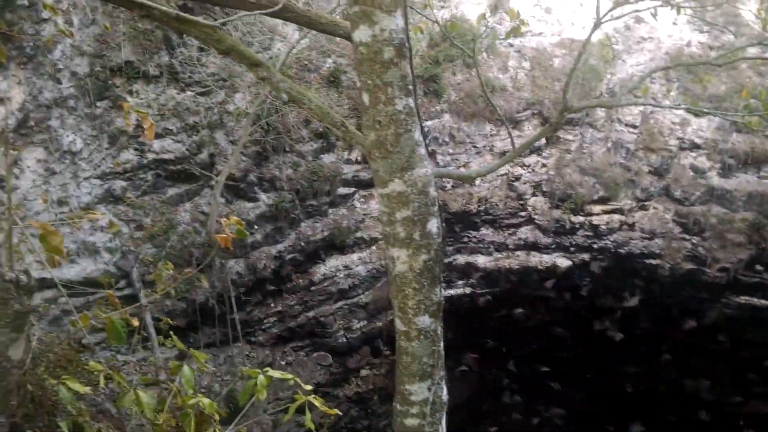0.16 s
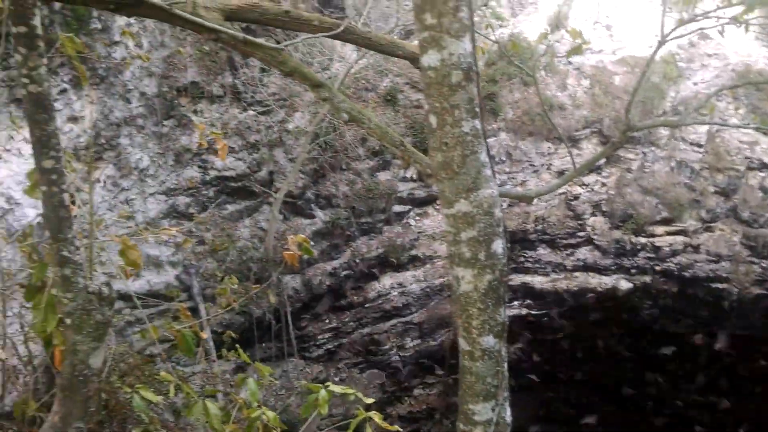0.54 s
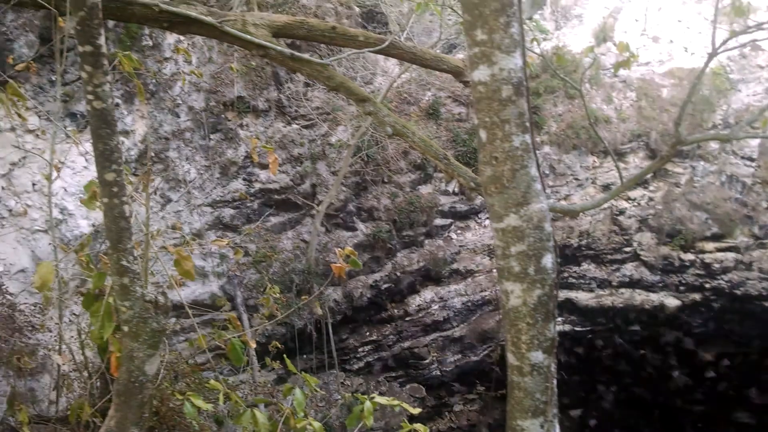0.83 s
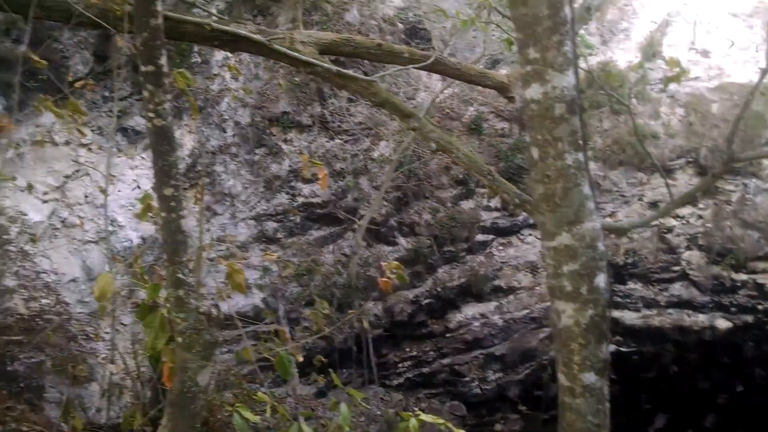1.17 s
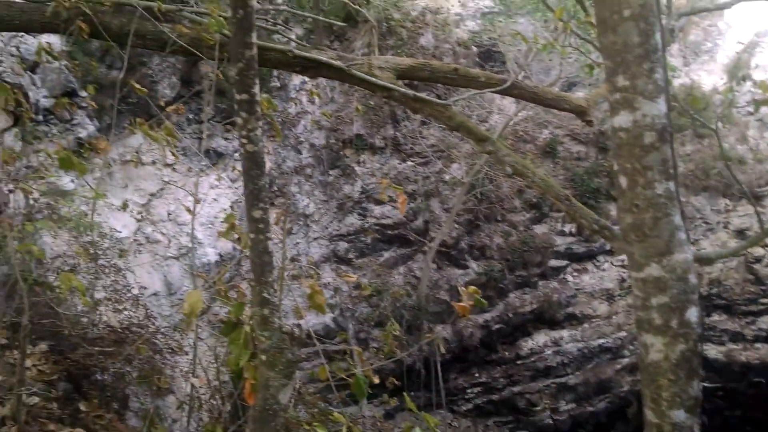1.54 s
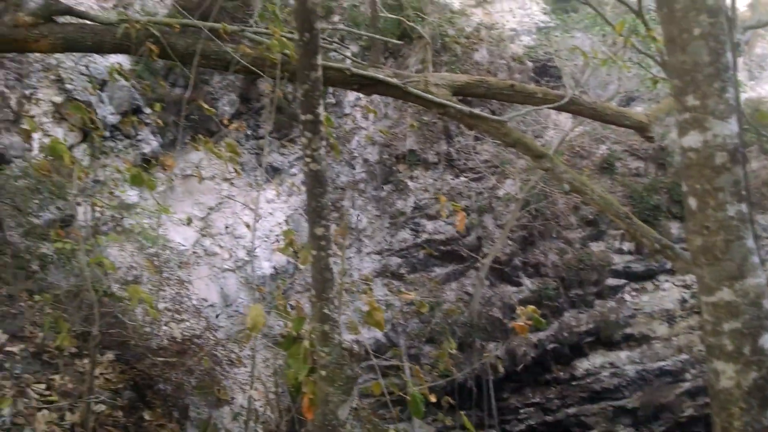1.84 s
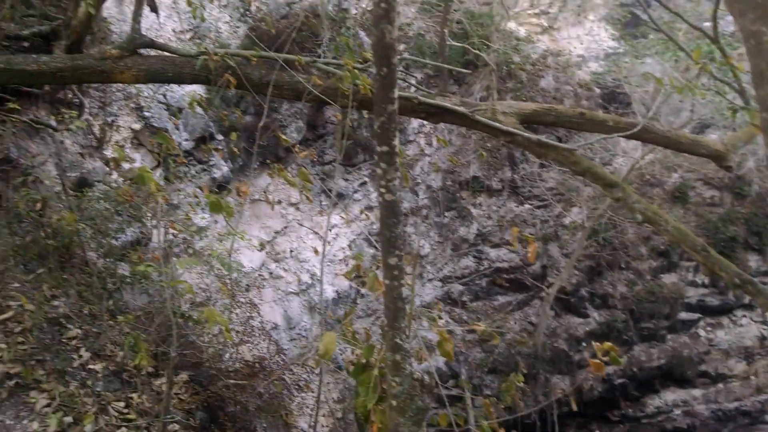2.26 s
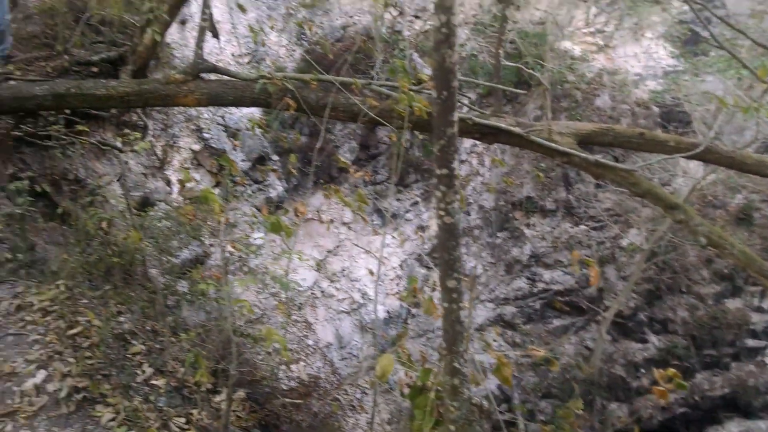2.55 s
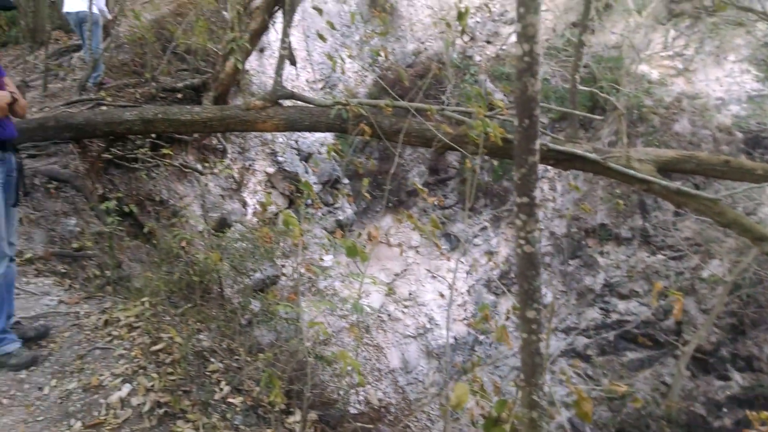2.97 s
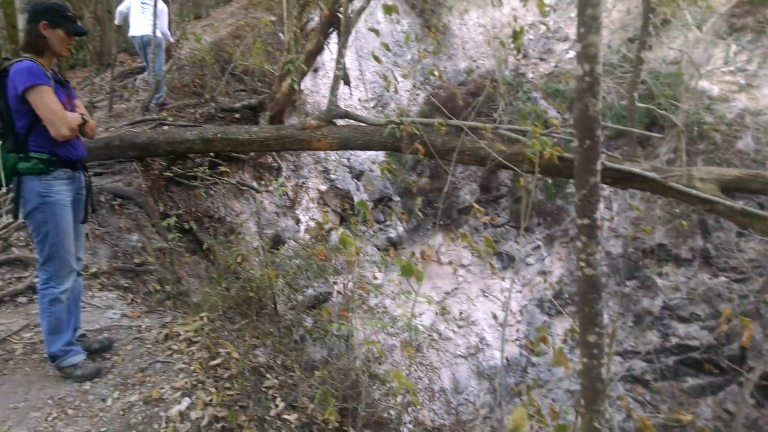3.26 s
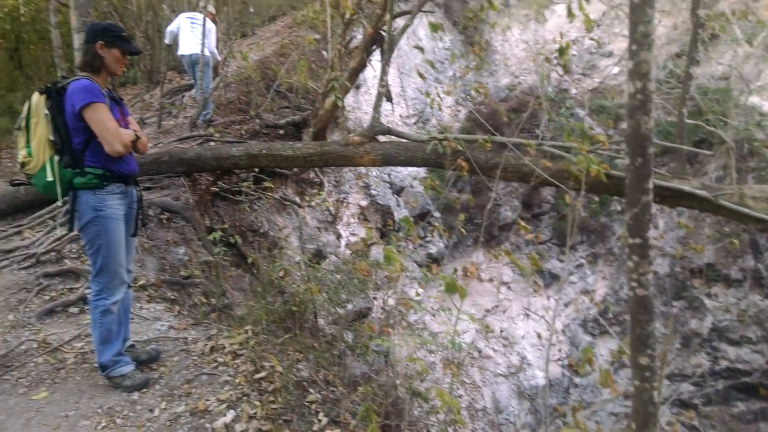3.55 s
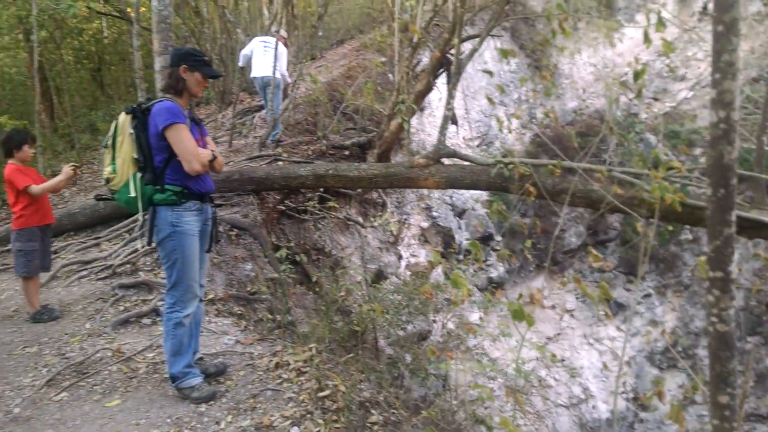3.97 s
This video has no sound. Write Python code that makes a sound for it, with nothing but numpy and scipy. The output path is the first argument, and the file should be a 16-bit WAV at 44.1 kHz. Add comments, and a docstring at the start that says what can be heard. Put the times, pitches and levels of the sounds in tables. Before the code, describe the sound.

Many bats squeak in short, very high chirps over a steady hiss and the soft roar of wings at a forest cave.

```python
"""A forest path, with a swarm of bats streaming out of a cave mouth on the right.
Countless wingbeats merge into a soft roar that sets the cave mouth ringing, and distant calls
blur into a high hiss. On top, the nearest bats squeak in short falling sweeps that the rock face
throws back. A faint hum, a few papery rustles and light knocks fill in the background."""
import sys
import numpy as np
from scipy import signal
from scipy.fft import rfft, irfft
from scipy.io import wavfile
from scipy.ndimage import uniform_filter1d

SR = 44100
rng = np.random.default_rng(int(sys.argv[2]) if len(sys.argv) > 2 else 0)


def transcribe(signal):
    """Save signal, clipped to [-1, 1], as a 16-bit WAV file at the path in sys.argv[1]."""
    frames = np.atleast_2d(signal).T
    limited = np.clip(frames, -1, 1)
    pcm = np.round(limited * 32767).astype(np.int16)
    wavfile.write(sys.argv[1], SR, pcm)


N = 181495
TIME = np.arange(N) / SR
BIN_HZ = np.arange(N // 2 + 1) * SR / N

# Fader ride of the low hum. Each row: time in seconds, level in dB before panning.
HUM_RIDE = [(0, -56), (.45, -60), (.65, -56.5), (1.15, -55), (1.55, -59.5), (1.9, -57.5), (2.15, -60),
            (2.75, -62), (2.95, -57.5), (3.5, -59.5), (3.85, -66), (4.12, -62)]
# Knocks on the path. Each row: start in seconds, level in dB before EQ, pitch in Hz.
KNOCKS = [(2.131, -45, 1290), (2.497, -30.5, 850), (2.502, -33.5, 850)]
# A knock's hollow ring. Each row: multiple of its pitch, relative level in dB.
KNOCK_PARTIALS = [(1, 0), (1.22, -8), (1.85, -8), (2.35, -20)]
# EQ that takes the bass and the sharp edge off a knock. Each row: frequency in Hz, gain in dB.
KNOCK_EQ = [(450, -20), (780, 0), (1950, 0), (2600, -18)]
# Fader rides of the cave mouth's two resonances. Each row: time in seconds, level in dB.
LOW_RING_RIDE = [(0, -53), (.18, -54.5), (.38, -59), (.62, -54), (.93, -66), (1.2, -57), (1.4, -56),
                 (1.55, -60), (1.78, -57), (1.95, -62), (2.18, -55), (2.7, -60.5), (3.1, -57.5),
                 (3.65, -60), (4.12, -63)]
HIGH_RING_RIDE = [(0, -64), (.25, -56.5), (.55, -68), (1.0, -64), (1.5, -63), (1.8, -59), (2.02, -63),
                  (2.2, -50), (2.4, -52.5), (2.62, -60), (2.9, -55), (3.3, -61), (3.75, -61), (4.12, -54.5)]
# Stereo image of roar and rustles before widening. Each row: frequency in Hz, left-right correlation.
AIR_CORRELATION = [(40, 0.14), (200, 0.63), (650, 0.71), (1300, 0.49), (1900, -0.02)]
# Comb that widens that image. Each row: frequency in Hz, depth of the swing in correlation.
WIDENING_DEPTH = [(500, 0.17), (1300, 0.25), (2400, 1.26), (3400, 1.44), (5700, 1.73), (6600, 0.8),
                  (8000, 0.65)]
# Close rustles. Each row: peak time in seconds, length in seconds, centre in Hz, level in dB.
RUSTLE_CUES = [(1.503, .025, 4640, -54.5), (1.8, .03, 4100, -59), (2.41, 0.064, 3830, -60.5),
               (2.903, .04, 4000, -60)]
# Fader ride of the wing roar. Each row: time in seconds, relative level in dB.
WING_RIDE = [(0, -48), (.6, -48), (.95, -50), (1.1, -48), (1.95, -48.5), (2.22, -47.5), (2.45, -47),
             (2.65, -50), (2.9, -48), (3.3, -48), (4.12, -47.5)]
# Tone of the wing roar. Each row: frequency in Hz, relative level in dB.
WING_EQ = [(20, -6), (100, -7), (135, -2.5), (220, -2.5), (330, -1.5), (500, -1.5), (750, -5), (1100, -10),
           (1800, -13.5), (3000, -17), (4900, -23), (6000, -19.5), (7200, -10.5), (15000, -22.5)]
# Bands where the wing membranes flutter. Each row: centre in Hz, half-width in Hz.
WING_FLUTTER = [(1300, 420), (3900, 900), (6800, 3400)]
# The body of the roar leans towards the cave. Each row: frequency in Hz, left minus right in dB.
WING_PAN = [(80, 0), (180, -1.3), (350, -1), (650, -3), (1200, .5), (2500, 0)]
# Fader ride of the distant calls. Each row: time in seconds, relative level in dB.
CHORUS_RIDE = [(0, -36.5), (.15, -35.5), (.4, -36.5), (.65, -36), (.75, -38), (1.0, -38), (1.22, -39),
               (1.32, -37.5), (1.85, -36.5), (2.08, -36.5), (2.4, -35), (2.58, -38.5), (2.72, -38.5),
               (3.0, -36), (3.28, -36), (3.72, -38), (4.12, -34)]
# Tone of their hiss. Each row: frequency in Hz, relative level in dB.
CHORUS_EQ = [(5500, -108), (7500, -9), (8700, -5.5), (9500, -0.5), (10050, 0), (11000, -2), (12400, -5),
             (13700, -2), (15200, 2.5), (16000, 6)]
# The nearest bats. Each row: start in seconds, length in seconds, start pitch in Hz, end pitch in Hz,
# bend (0 is straight, 3 levels off early), relative level in dB, share scattered by ledges (0 to 1).
NEAR_CALLS = [(.028, .022, 13000, 9800, 1.0, -27, .4), (.032, 0.026, 14000, 11100, .5, -26.5, 0.36),
              (.085, .018, 11000, 9800, .5, -29, .6), (.122, .025, 13800, 12050, 2.5, -29, .3),
              (.124, .018, 10800, 9660, 1.1, -25.5, .3), (.203, .013, 14600, 12200, .3, -28, .35),
              (.213, 0.022, 12300, 9350, .3, -25.5, .3), (.308, 0.018, 14200, 10600, .5, -27.5, .4),
              (.412, .012, 12000, 10350, .5, -28, .7), (.493, .012, 14000, 11700, .3, -35, .3),
              (.520, .032, 11200, 10400, 2.7, -30.5, .4), (.580, 0.047, 14300, 10900, 2.0, -24.5, .25),
              (.592, .018, 14000, 12400, .5, -31, .4), (.6265, 0.0043, 16000, 8900, 0.27, -19, 0.22),
              (.700, .024, 14500, 11300, .6, -27, .25), (.776, 0.03, 14700, 10400, 0.23, -28.5, .4),
              (.797, .025, 14700, 11300, .3, -29, .2), (.838, .020, 13000, 11200, .3, -30, .25),
              (.877, .016, 15800, 10700, .3, -28, .3), (.892, 0.021, 13800, 12300, .5, -32, .3),
              (.994, 0.021, 12800, 10950, 1.1, -30.5, .15), (1.066, .014, 13800, 12800, .4, -34, .3),
              (1.122, .010, 14800, 13500, .5, -31, .4), (1.138, .021, 14900, 12950, .5, -28.5, .4),
              (1.165, 0.0077, 12000, 10100, .6, -22.5, .15), (1.250, .013, 14500, 12300, .3, -33, .4),
              (1.272, .011, 11200, 9850, 2.4, -20.5, .08), (1.283, .014, 14900, 13400, .3, -31, .3),
              (1.380, .009, 16000, 13200, .1, -25.5, .4), (1.389, .006, 14500, 11500, .1, -30, .3),
              (1.477, .014, 14700, 12600, .4, -32, .3), (1.523, 0.01, 13000, 11500, .5, -28.5, .2),
              (1.570, 0.024, 13500, 11250, .6, -27.5, .2), (1.602, 0.02, 10900, 9430, 0.9, -26, 0.39),
              (1.617, .010, 12800, 11500, 1.0, -27, .6), (1.610, .016, 12300, 9300, .3, -31, .5),
              (1.698, .012, 14000, 9700, 0.23, -30, .3), (1.735, .012, 14300, 12900, .4, -31, .4),
              (1.805, .014, 13500, 12100, .5, -34, .3), (1.883, .032, 14200, 10900, .85, -29, .4),
              (1.905, .018, 13800, 9200, 0.27, -30.5, .5), (1.995, .034, 14500, 10630, 4, -28.5, .3),
              (2.192, .018, 15200, 13100, .4, -32, .3), (2.214, .018, 13000, 11400, 1.2, -28, .3),
              (2.282, .012, 15200, 13300, .4, -29, .3), (2.298, .013, 13000, 12100, .8, -27, .3),
              (2.310, .014, 13800, 11900, .5, -29, .3), (2.327, 0.015, 11500, 9050, 0.35, -29, .2),
              (2.388, 0.0073, 13900, 12300, .5, -26, .4), (2.408, .009, 15200, 10000, .2, -28, .3),
              (2.522, .012, 13000, 12000, .5, -33, .3), (2.675, 0.011, 13400, 11800, .4, -36, .4),
              (2.950, .042, 15000, 9960, 0.73, -33.5, .4), (3.005, .025, 14000, 11500, .5, -36, .4),
              (3.065, .018, 10400, 10000, 2.3, -32, .3), (3.142, 0.024, 12400, 9970, 1.1, -22, .2),
              (3.146, .024, 13300, 11300, .5, -30, .4), (3.186, .018, 10900, 10100, .3, -29, .3),
              (3.249, 0.017, 13500, 10600, .8, -24, .5), (3.258, .010, 11200, 9870, .96, -18.5, .1),
              (3.262, .006, 15500, 10500, .2, -27, .6), (3.310, 0.013, 11000, 10200, .5, -28, .4),
              (3.347, .013, 12800, 10100, .3, -27.5, .3), (3.365, 0.015, 12300, 10500, .5, -32, .3),
              (3.415, .016, 11000, 9900, 0.53, -32, .3), (3.455, .008, 14800, 13000, .4, -29, .3),
              (3.460, .022, 12700, 10400, 1.0, -31, .2), (3.520, .015, 15200, 13900, .4, -29.5, .55),
              (3.552, .012, 14200, 13100, .5, -33, .4), (3.580, .012, 14800, 10800, .3, -31, .3),
              (3.626, .012, 15000, 13000, .4, -31, .4), (3.644, .012, 14700, 12500, .4, -32, .5),
              (3.533, .010, 13400, 11300, .5, -30, .4), (3.642, 0.013, 13000, 10700, 3, -30, .4),
              (3.668, 0.047, 12500, 10800, 1.8, -28.5, .15), (3.770, 0.017, 13800, 10750, 3.5, -29, .15),
              (3.775, .026, 15200, 12500, .4, -31.5, .6), (3.800, .016, 12500, 11000, .5, -31, .3),
              (3.820, 0.026, 11000, 10000, .3, -26.5, .3), (3.901, 0.017, 13700, 10900, .3, -31, .3),
              (3.928, 0.03, 12100, 9800, .5, -28, .3), (3.955, .020, 11800, 10000, 0.56, -32, .4),
              (4.012, .020, 15200, 12700, .4, -32, .4), (4.055, 0.0097, 12000, 10600, 1.7, -25, .4),
              (4.066, 0.024, 13500, 10900, 1.0, -30, .3), (4.090, .012, 14800, 12500, .3, -32, .3)]


def undb(db):
    """Decibels to gain."""
    return 10 ** (np.asarray(db) / 20)


def unit(x):
    """Scale to rms 1."""
    return x / np.sqrt(np.mean(x ** 2))


def ride(rows):
    """Turn (seconds, dB) points into a gain for every sample."""
    return undb(np.interp(TIME, *np.transpose(rows)))


def across_bins(rows):
    """Read (Hz, value) points at every frequency bin, on a log axis."""
    hz, value = np.transpose(rows)
    return np.interp(np.log(BIN_HZ + 1), np.log(hz), value)


def eq(x, gain):
    """Filter with one gain for each frequency bin."""
    return irfft(rfft(x) * gain, N)


def resonance(x, hz, half_width_hz):
    """Keep a band around one frequency."""
    return eq(x, 1 / (1 + ((BIN_HZ - hz) / half_width_hz) ** 2))


def wobble(per_s):
    """Smooth random modulation with a spread near 1 and per_s new values a second."""
    hold = max(int(SR / per_s), 1)
    steps = np.repeat(rng.standard_normal(N // hold + 1), hold)
    return np.sqrt(2) * uniform_filter1d(uniform_filter1d(steps, hold), hold)[:N]


def add(track, s, sound):
    """Mix a sound into a track at s seconds."""
    start = int(np.clip(s * SR, 0, N))
    track[..., start:start + sound.shape[-1]] += sound[..., :N - start]


def from_right(x, lag_s=.000322):
    """Sound from the cave reaches the left side a little later."""
    return np.array([eq(x, np.exp(-2j * np.pi * BIN_HZ * lag_s)), x])


def hum(hz=61.25, left_db=.5, right_db=-6):
    """A faint low hum sits to the left and wavers a little."""
    tone = np.sqrt(2) * np.sin(2 * np.pi * hz * TIME + .15 * wobble(4))
    return tone * ride(HUM_RIDE) * undb([[left_db], [right_db]])


def knocks(t60=.017, contact_s=.00056):
    """Small things knock on the path: a soft contact, then a hollow ring whose upper modes die first."""
    track, t = np.zeros(N), TIME[:SR // 20]
    attack = 1 - np.exp(-(t / contact_s) ** 2)
    for s, db, hz in KNOCKS:
        ring = sum(undb(mode_db - 60 * t * ratio / t60) * np.sin(2 * np.pi * hz * ratio * t)
                   for ratio, mode_db in KNOCK_PARTIALS)
        add(track, s, undb(db) * ring * attack)
    return eq(track, undb(across_bins(KNOCK_EQ)))


def cave_mouth_ring():
    """The cave mouth rings faintly with wing noise: two narrow noise bands that swell in turn."""
    low = unit(resonance(rng.standard_normal(N), hz=219, half_width_hz=38))
    high = unit(resonance(rng.standard_normal(N), hz=316, half_width_hz=58))
    return low * ride(LOW_RING_RIDE) + high * ride(HIGH_RING_RIDE)


def air_noise(colour, widening_lag_s=.000376):
    """Wide coloured noise: its two sides swing between alike and opposite along the spectrum."""
    comb = across_bins(WIDENING_DEPTH) * np.cos(2 * np.pi * BIN_HZ * widening_lag_s)
    correlation = np.clip(across_bins(AIR_CORRELATION) - comb, -.998, .998)
    mid = eq(rng.standard_normal(N), colour * np.sqrt(1 + correlation))
    side = eq(rng.standard_normal(N), colour * np.sqrt(1 - correlation))
    return unit(np.array([mid + side, mid - side]))


def rustles(half_width_hz=900):
    """Short papery swishes near the path."""
    track = np.zeros((2, N))
    for peak_s, length_s, hz, db in RUSTLE_CUES:
        swish = air_noise(np.exp(-((BIN_HZ - hz) / half_width_hz) ** 2))
        swell = np.exp(-(2 * (TIME - peak_s) / length_s) ** 2)
        track += swish * swell * undb(db)
    return track


def wing_roar(gain_db=3.5):
    """Puffs of air from countless wings overlap into a low roar whose papery top flutters unevenly."""
    rush = air_noise(undb(across_bins(WING_EQ))) * ride(WING_RIDE) * undb(gain_db)
    roar = rush.copy()
    for hz, half_width_hz in WING_FLUTTER:
        flutter_db = .7 * wobble(22) + .7 * wobble(70) + 1.1 * wobble(400) - .3
        roar += resonance(rush, hz, half_width_hz) * (undb(flutter_db) - 1)
    pan_db = across_bins(WING_PAN)
    return eq(roar, undb([pan_db / 2, -pan_db / 2]))


def bat_call(length_s, start_hz, end_hz, bend=.863, waver_hz=115):
    """One call: the pitch drops fast and levels off while the voice swells, then stops short."""
    progress = np.linspace(0, 1, max(int(length_s * SR), 32))
    hz = end_hz + (start_hz - end_hz) * (1 - progress) * np.exp(-bend * progress)
    hz += waver_hz * np.interp(progress, np.linspace(0, 1, 16), rng.standard_normal(16))
    swell = progress ** .56 * (1 - progress ** 8)
    return np.sqrt(2) * swell / swell.max() * np.sin(2 * np.pi * np.cumsum(hz) / SR)


def far_calls(count=3000):
    """Many bats far off, each with its own pitch, call length and distance."""
    track = np.zeros(N)
    for when, pitch, fall, length, loud in np.c_[rng.random((count, 4)), rng.standard_normal(count)]:
        end_hz = 8000 + 7700 * pitch
        call = bat_call(.005 + .02 * length, end_hz + 500 + 3000 * fall, end_hz)
        add(track, when * N / SR, call * undb(3.5 * min(loud, 2)))
    return unit(track)


def distant_chorus(left_db=-1.5, right_db=6.5, flicker_db=.67):
    """A bed of distant calls, some direct, most blurred into hiss inside the cave."""
    from_mouth = undb(-5) * rng.standard_normal(N) + undb(-6) * far_calls()
    all_round = rng.standard_normal((2, N))
    crowd = (all_round + from_right(from_mouth)) * undb(flicker_db * wobble(27.7))
    hiss = unit(eq(crowd, undb(across_bins(CHORUS_EQ))))
    return hiss * ride(CHORUS_RIDE) * undb([[left_db], [right_db]])


def midstream_calls(per_s=52, low_hz=9530, high_hz=12860, max_fall_hz=3793, scattered=.51):
    """Rows like NEAR_CALLS for weaker bats deeper in the stream; their level follows the chorus."""
    count = int(per_s * N / SR)
    when, length, pitch, fall, bend, loud = rng.random((6, count))
    start_s = (np.arange(count) + when) / per_s
    length_s = np.interp(length, [0, 1], [.00805, .026])
    end_hz = low_hz + (high_hz - low_hz) * pitch ** 1.4  # favours the low pitches
    start_hz = end_hz + max_fall_hz * np.sqrt(fall)
    db = np.interp(start_s, *np.transpose(CHORUS_RIDE)) - 5 + 4 * loud
    return np.c_[start_s, length_s, start_hz, end_hz, .99 * bend, db, np.full(count, scattered)]


def ledge_reflections(call, count=24, mean_lag_s=.009):
    """Early reflections off the ledges, different for every call because the bat has flown on."""
    span = SR // 20
    lags = np.minimum(SR * rng.exponential(mean_lag_s, (2, count)), span - 1).astype(int)
    gains = rng.standard_normal((2, count))
    taps = np.array([np.bincount(lag, gain, span) for lag, gain in zip(lags, gains)])
    taps /= np.linalg.norm(taps, axis=1, keepdims=True)
    return signal.fftconvolve(call[None], taps, axes=1)


def cliff_echo(x, t60=.34):
    """Rough rock scatters the sound into a dense dying tail, different on each side."""
    t = TIME[:SR // 2]
    tail = rng.standard_normal((2, len(t))) * undb(-60 * t / t60)
    tail /= np.linalg.norm(tail, axis=1, keepdims=True)
    return signal.fftconvolve(x[None], tail, axes=1)[:, :N]


def cave_tail(x, hz=10080, half_width_hz=950, t60=.39):
    """Air soaks up the highest pitches on the way round the cave; the rest lingers as a narrow hiss."""
    def band(sound):
        return resonance(resonance(sound, hz, half_width_hz), hz, half_width_hz)

    decay = np.exp(-2 * np.log(1000) / (t60 * SR))
    energy = signal.lfilter([1 - decay], [1, -decay], band(x) ** 2)
    return np.sqrt(energy) * unit(band(rng.standard_normal((2, N))))


def squeaks(rough_db=2, cliff_db=-10.5, cave_db=-5, left_db=-14, right_db=-4.8):
    """The nearer bats: ledges fray each call, the cliff scatters it, its low end lingers in the cave."""
    direct, send, early = np.zeros(N), np.zeros(N), np.zeros((2, N))
    for s, length_s, start_hz, end_hz, bend, db, scattered in [*NEAR_CALLS, *midstream_calls()]:
        call = undb(db) * bat_call(length_s, start_hz, end_hz, bend)
        add(direct, s, np.sqrt(1 - scattered) * call)
        add(early, s, np.sqrt(scattered) * ledge_reflections(call))
        add(send, s, call)
    direct *= undb(rough_db * wobble(700))
    tails = undb(cliff_db) * cliff_echo(send) + undb(cave_db) * cave_tail(send)
    return (from_right(direct) + early + tails) * undb([[left_db], [right_db]])


def scene():
    """Roar, hiss and squeaks over the quiet forest."""
    background = hum() + knocks() + cave_mouth_ring() + rustles()
    return background + wing_roar() + distant_chorus() + squeaks()


def record(dry, top_hz=15550):
    """A steep low-pass takes the very top off the mix."""
    return signal.sosfilt(signal.ellip(12, .2, 75, top_hz, fs=SR, output="sos"), dry)


dry = scene()
out = record(dry)
transcribe(out)
```